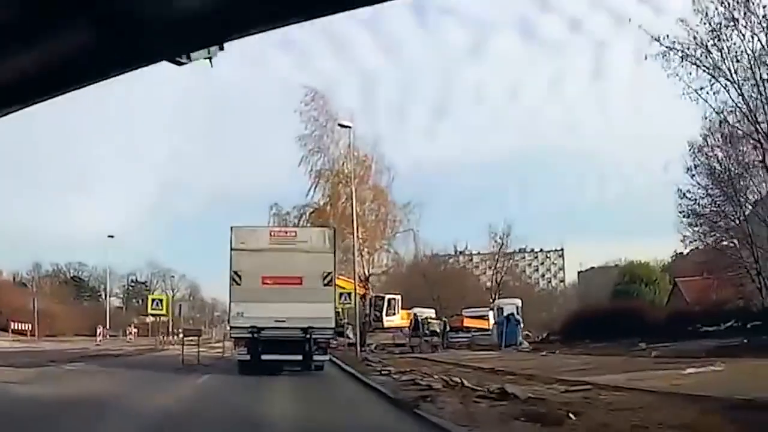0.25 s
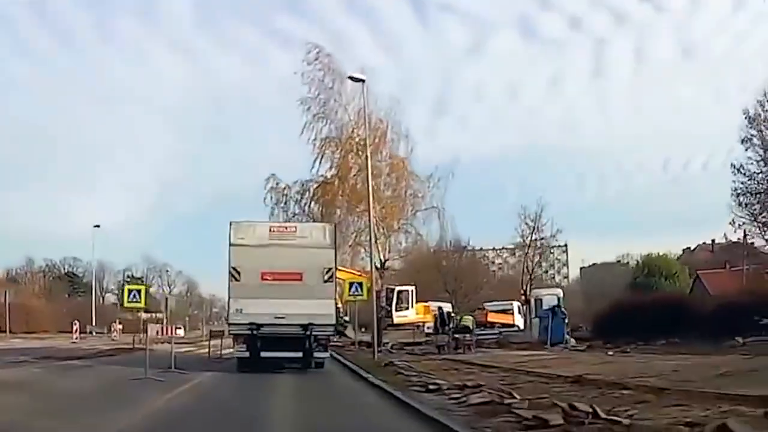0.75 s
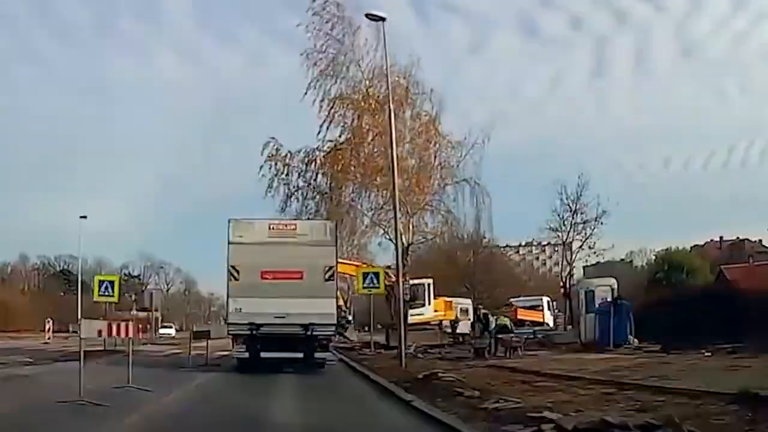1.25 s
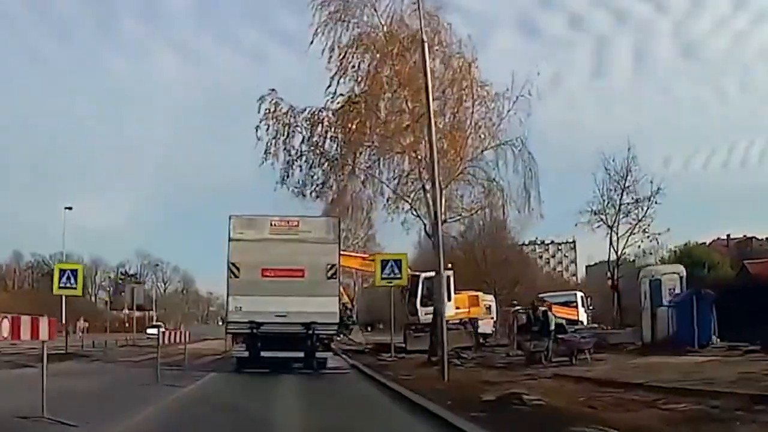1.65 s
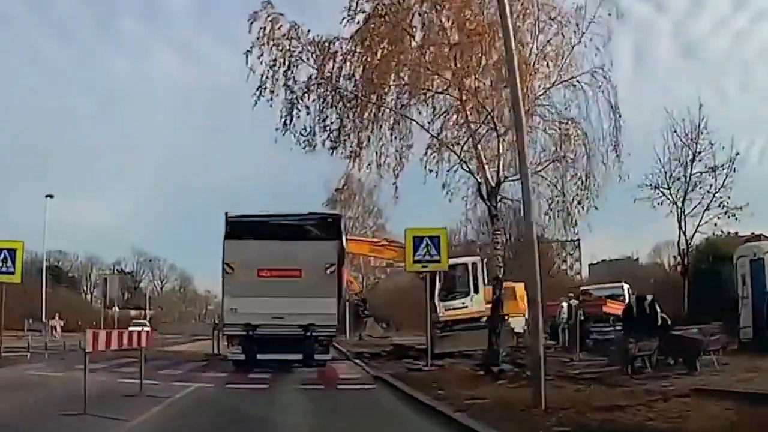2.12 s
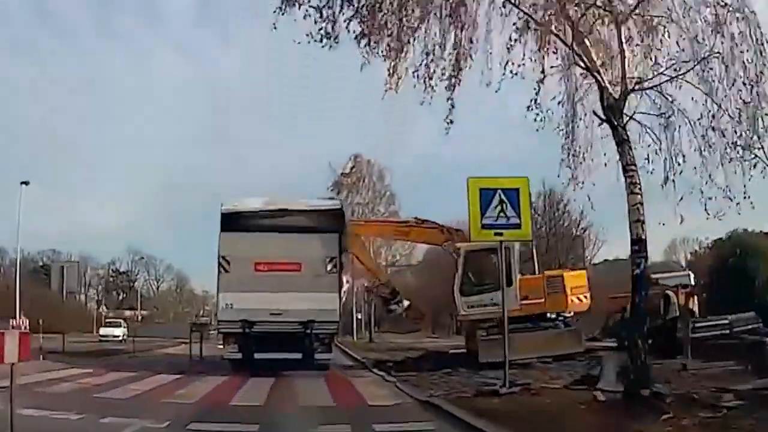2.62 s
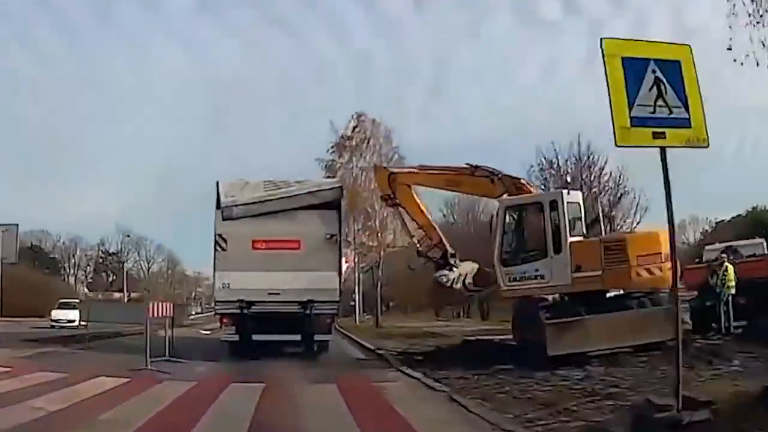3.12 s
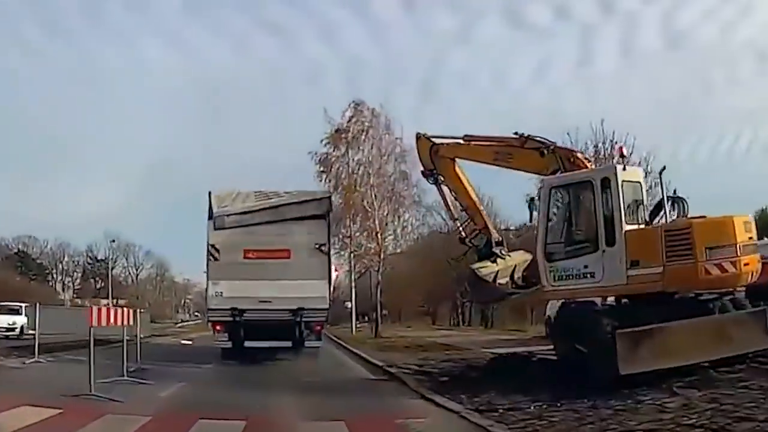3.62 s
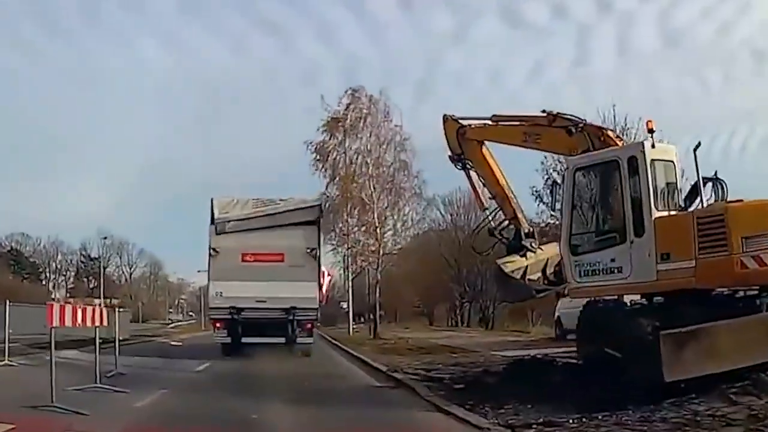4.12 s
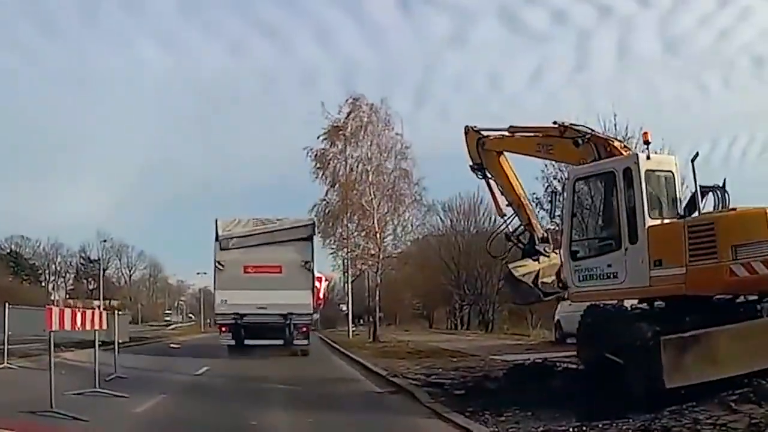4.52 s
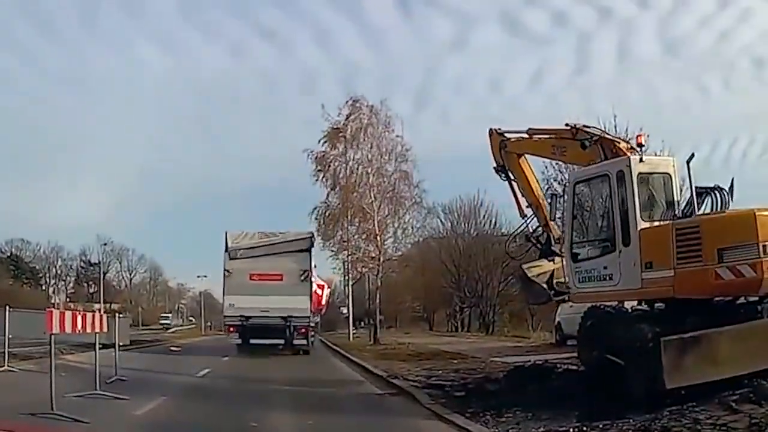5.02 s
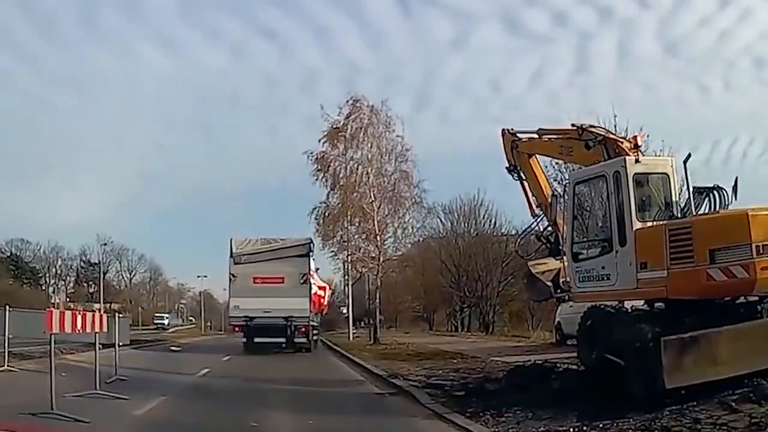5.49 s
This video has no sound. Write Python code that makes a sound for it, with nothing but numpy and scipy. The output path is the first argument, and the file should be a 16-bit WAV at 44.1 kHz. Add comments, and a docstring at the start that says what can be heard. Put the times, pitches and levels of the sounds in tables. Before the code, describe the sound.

The microphone sits inside a car cabin, with limited treble. From 0 to 2.2 s there is steady, muffled tyre roar with low suspension rumble and a faint engine hum, which fades after 2 s. At about 2.3 s the truck's roof hits something ahead: a blunt metallic crunch, strongest until 2.45 s, then ragged scraping and short wavering groans and squeals around 2.6-2.9 s, dulled by the windscreen and thinning afterwards. From 3.2 s the car pounds over broken road, far louder and closer: irregular deep thumps, booming cabin air, shuddering panels, chattering trim and dozens of dry knocks. A harsh overloaded pop lands at 3.61 s; two hard plastic cracks at the microphone come at 4.36 and 4.40 s. The pounding collapses after 4.5 s. Small hollow clunks and knocks follow at 4.65-5.1 s, with tiny high brake squeaks, one very faint near 5.5 s, over a softer, sinking road roar until the end.

```python
"""Truck roof tearing, then broken road

Microphone inside a car that follows a box truck through road works; tyre roar and engine hum fill the cabin.
Ahead, beyond the windscreen, the truck's roof crashes into an overhead obstacle: random slips ring its metal.
The car then jolts over broken road: blows and noise ring the body, cabin air, panels and trim.
Two sharp bangs reach the microphone's mount and one blow pins its diaphragm.
The roar sinks as the car slows, with faint brake squeaks made of pitch-jittered sines.
"""
import sys
import numpy as np
from scipy import signal
from scipy.fft import rfft, irfft
from scipy.io import wavfile
from scipy.ndimage import uniform_filter1d, map_coordinates

SR = 44100
rng = np.random.default_rng(int(sys.argv[2]) if len(sys.argv) > 2 else 0)


def master(y):
    """Save y as 16-bit WAV."""
    cut = np.clip(np.atleast_2d(y).T, -1, 1)
    pcm = np.round(cut * 32767)  # scale
    wavfile.write(sys.argv[1], SR, pcm.astype(np.int16))


N = 253707
TIME = np.arange(N) / SR  # s

# All levels are relative to their layer unless called peak or rms.
# The truck's roof catches and tears on: t/s, hold/s, thrum level/dB, panel level/dB, grinding level/dB
SCRAPES = [(2.275, 0.042, -44.5, -43, -48), (2.324, 0.061, -27.5, -28.5, -37.5),
           (2.50, 0.2, -36, -37.5, -45.5), (2.70, 0.011, -38.5, -31.5, -43), (2.865, 0.026, -35, -41, -54),
           (3.0, 0.083, -46, -43.5, -57.5), (3.125, 0.05, -44, -44, -52), (3.27, 0.37, -45, -37.5, -51.5)]
SCRAPE_ATTACK_S, SCRAPE_RELEASE_DB_PER_S = 0.016, 71.5
# Roof panel resonances: f/Hz, width/Hz, level/dB
ROOF_MODES = [(417, 14.8, 4), (504, 82, -3), (654, 160, -7), (921, 96, -6), (1014, 23, -3), (1191, 81, -7),
              (1528, 210, -15)]
# Resonances of the torn edge: f/Hz, width/Hz, level/dB
EDGE_MODES = [(1870, 110, -7.5), (2250, 130, -8), (2558, 30, 0), (2798, 156, -11.5), (4500, 220, -21)]
# Friction tones of the groaning roof, then of the brakes: t/s, length/s, f/Hz, pitch jitter/share, level/dB
SQUEAKS = [(2.585, .05, 895, .015, -43), (2.64, .08, 1000, .016, -36), (2.708, .075, 490, .012, -31.5),
           (2.745, .065, 1005, .02, -39), (2.84, .045, 415, .015, -38), (4.68, .05, 2650, .05, -61.5),
           (4.698, .016, 5200, .03, -71), (4.79, .03, 2800, .05, -55.5), (4.992, .02, 5350, .015, -78),
           (5.45, .16, 4480, .035, -72.5)]

# How hard the broken road shakes the car: t/s, level/dB
SHAKE = [(3.15, -34), (3.218, -23.5), (3.442, -30.5), (3.504, -14), (4.48, -19), (4.734, -30.5),
         (4.778, -27), (4.9, -70)]
# Steady response to the shaking; panels and trim follow only a share of its swing in dB
SHAKE_HEAVE_DB, SHAKE_BOOM_DB, SHAKE_PANEL_DB, SHAKE_TRIM_DB = -16.5, -9.5, -33.5, -50.5
RATTLE_FOLLOWS = 0.35
# A wheel drops into a hole: t/s, hold/s, suspension heave level/dB, body boom level/dB, rattle level/dB
JOLTS = [(3.193, 0.057, -40, -43.5, -38), (3.267, 0.033, -13.5, -29, -32.5), (3.395, 0.018, -46, -34, -32),
         (3.492, 0.083, -23, -22, -34.5), (3.590, 0.009, -20.5, -27, -27.5),
         (3.666, 0.1, -35.5, -29, -41.5), (3.753, 0.031, -32.5, -25, -32.5),
         (3.867, 0.041, -27.5, -22.5, -30.5), (3.933, 0.022, -18.5, -32, -37),
         (4.032, 0.012, -17.5, -35, -36), (4.116, 0.019, -27.5, -24, -39.5),
         (4.16, 0.019, -19.5, -27.5, -36.5), (4.198, 0.029, -29, -24, -32.5), (4.252, 0.029, -27, -33, -36),
         (4.332, 0.075, -15, -24.5, -29.5), (4.411, 0.033, -35.5, -26.5, -37),
         (4.528, 0.024, -16.5, -37, -50), (4.753, 0.012, -33, -34.5, -37)]
JOLT_ATTACK_S, JOLT_RELEASE_DB_PER_S, HEAVE_RELEASE_DB_PER_S = 0.013, 187, 117.5
TRIM_UNDER_PANEL_DB = -20  # trim chatter against the panels' rattle
# Car body and cabin air: f/Hz, width/Hz, level/dB
BODY_MODES = [(78.8, 25, -1), (132, 24, -4), (176.3, 21, -3), (231, 50, -3), (289, 98, -12)]
# Dashboard and door panels: f/Hz, width/Hz, level/dB
PANEL_MODES = [(312, 123, 3.5), (443, 100, 4), (521.5, 48, 0.5), (673, 51, -1), (744, 36, 1.5),
               (872, 132, -2.5), (1010, 184, -5), (1274, 202, -8.5)]
# Small plastic trim: f/Hz, width/Hz, level/dB
TRIM_MODES = [(1405, 91, 10.5), (2050, 330, 0.5), (2395, 510, 0.5), (2730, 570, -2), (4360, 230, -6.5),
              (5380, 400, -24)]

# Tyre blows on the body: t/s, peak level/dB
THUDS = [(3.483, -19), (3.511, -11), (3.597, -27), (3.668, -24), (3.714, -20.5), (3.868, -14),
         (3.899, -14.5), (3.955, -16), (4.040, -13.5), (4.128, -15.5), (4.172, -17.5), (4.217, -18.5),
         (4.261, -16.5), (4.289, -28), (4.329, -12), (4.376, -12.5), (4.433, -18), (4.493, -21)]
# The cabin air's deepest resonance: f/Hz, width/Hz, level/dB
AIR_MODES = [(84, 5.2, 0)]
# Shoves that set the cabin air booming: t/s, peak level/dB
BOOMS = [(3.203, -19), (3.28, -27.5), (3.754, -23), (4.029, -20), (4.203, -21.5), (4.452, -20.5)]
# The body bouncing on its springs: f/Hz, width/Hz, level/dB
SPRING_MODES = [(30.8, 23, 3.5), (52, 22, 0.5)]
# The deepest holes bottom the springs out: t/s, peak level/dB
BOTTOMINGS = [(3.586, -18), (3.919, -17), (4.375, -18.5)]

# Knocks of loose fittings: t/s, panel level/dB, trim level/dB, tick level/dB, buzz decay/s
KNOCKS = [(2.884, -28, -38, -22, 0.014), (3.186, -22.5, -34, -26, 0.018), (3.221, -23, -27, -24, 0.0055),
          (3.259, -8, -23.5, -17, 0.0032), (3.2678, -16, -25.5, -38, 0.011),
          (3.279, -11.5, -29, -36, 0.0088), (3.289, -14, -40, -38, .006), (3.306, -20, -28, -29, .005),
          (3.317, -21.5, -24, -21, .005), (3.356, -30, -20, -21, .006), (3.3645, -13, -17.5, -24, 0.0048),
          (3.4041, -29, -19.5, -25, 0.01), (3.526, -23, -24.5, -32, 0.0033), (3.546, -15, -33, -28, 0.0047),
          (3.593, -20, -30, -14, .004), (3.635, -22, -32, -19, .004), (3.6395, -6.5, -18.5, -17, 0.0068),
          (3.664, -22, -31.5, -34, .0047), (3.675, -11, -29, -30, 0.0037), (3.739, -16.5, -37, -32, 0.0044),
          (3.788, -17, -30, -33, 0.0035), (3.815, -16, -32, -38, 0.0074), (3.867, -21, -39, -34, 0.0052),
          (3.888, -9, -30, -35, 0.0048), (3.909, -13, -35, -32, 0.0038), (3.962, -15, -26, -30, 0.0071),
          (3.978, -22, -28, -29, .004), (4.0225, -17, -49, -42, 0.0096), (4.05, -13, -34, -24, 0.0067),
          (4.1148, -12, -41, -34, 0.0061), (4.125, -17, -33, -26, 0.0059), (4.159, -15, -37, -39, 0.0069),
          (4.209, -17.5, -36, -32, 0.0046), (4.225, -20, -31.5, -26, 0.0037),
          (4.243, -13, -28.5, -29, 0.0023), (4.2605, -8.5, -42, -34, 0.0045),
          (4.279, -18, -38, -36, 0.0036), (4.342, -17, -39.5, -26, .004),
          (4.4405, -10.5, -24.5, -31, 0.0036), (4.477, -26, -41, -21, .005),
          (4.657, -25.5, -32.5, -39, .008), (4.779, -21.5, -35.5, -43, 0.017),
          (4.9195, -27, -30.5, -34, 0.014), (4.938, -18, -29.5, -46, 0.009), (4.971, -24, -43, -47, 0.018),
          (5.032, -29.5, -41.5, -46, 0.016), (5.075, -26, -37, -46, 0.012)]
# Full range of each knock's own panel mix (dB) and pitch (share)
KNOCK_MIX_DB, KNOCK_DETUNE = 8.5, .16
# A hollow loose part: f/Hz, width/Hz, level/dB
HOLLOW_MODES = [(380, 25, 5), (645, 14, -16), (790, 47, -12), (1010, 100, -13.5), (1460, 61, -19),
                (2620, 140, -33)]
# It clunks as the car settles: t/s, peak level/dB, pitch factor
CLUNKS = [(4.761, -24.5, 0.58), (4.777, -25.5, 0.63), (4.806, -27, 1.2), (4.922, -29.5, 1.62),
          (4.9365, -23.5, 0.93)]

# Bangs on the microphone's mount: t/s, low ring f/Hz, low ring level/dB, high ring level/dB, tick level/dB
MOUNT_BANGS = [(4.3555, 1360, -9, -15.5, -47.5), (4.3997, 936, -1.5, -13, -22)]
# Bounce and rattling tail, against the first blow
BANG_BOUNCE_DB, BANG_TAIL_DB, BANG_TAIL_S = -4, -29, 0.0055
# One blow pins the diaphragm: t/s, length/s, height, rebound height, rebound decay/s
SLAM = (3.6139, .00113, .92, .36, .0007)

# Tyre roar over the drive: t/s, level/dB
DRIVE = [(0, -37.5), (.9, -38), (1.7, -39), (2.3, -38.5), (3.1, -41.5), (4.6, -43.5), (5.05, -43.5),
         (5.3, -45.5), (5.75, -45.5)]
# Smooth cabin roar at speed: f/Hz, level per Hz/dB
ROAD_FAST = [(40, -14.5), (78, 0.5), (105, -8), (150, -6.5), (190, -2.5), (290, -6), (400, -7.5),
             (520, -13), (750, -14.5), (1050, -17.5), (1700, -30.5), (2700, -39.5), (3300, -54),
             (6000, -62.5), (9000, -98)]
# Cabin roar when slow: f/Hz, level per Hz/dB
ROAD_SLOW = [(41, -55), (70, -2.5), (156, 1.5), (226, 4), (426, -2), (459, -0.5), (523, -6.5), (1040, -10),
             (1260, -17.5), (1690, -25), (1890, -25.5), (2550, -26.5), (3700, -47), (4450, -42),
             (6000, -52), (7800, -92.5), (13200, -120)]
# Cabin resonances that the tyres excite at speed: f/Hz, width/Hz, level/dB
CABIN_MODES = [(239.1, 12, -4.5), (256.2, 7, 2), (282, 13, -6.5), (337, 15, -5.5), (631, 14, -10),
               (860, 22, -13.5), (1236, 40, -19.5), (2660, 120, -47)]
# Suspension rumble against the tyre roar level, and its random swell
RUMBLE_DB, RUMBLE_SWELL_DB = -5.5, 2.5
# Engine orders: multiple of the firing rate, rms level/dB before lift-off
ENGINE = [(1, -54.5), (3, -57.5), (4, -46)]
FIRING_HZ, LIFT_OFF_S, ENGINE_FADE_DB_PER_S = 60.37, 2, 27

MIC_LIMIT, CUTOFF_HZ = .85, 8300  # full scale = 1


def tearing_roof():
    """Slipping metal rings the truck's box, roof panel and torn edge; the windscreen dulls the distant sound."""
    thrum_gain, panel_gain, edge_gain = bursts(SCRAPES, SCRAPE_ATTACK_S, SCRAPE_RELEASE_DB_PER_S)
    slips = contacts(per_s=1400, spread_db=-3.0)
    thrum = even(cut(contacts(per_s=550, spread_db=1.0), [68, 310], "band", order=3), 0.052)

    panel = waver(resonate(slips, ROOF_MODES), 0.022, 5.2, 35)
    panel = even(cut(cut(panel, 1800, "low", order=4), 240, "high"), 0.029)

    edge = waver(resonate(slips, EDGE_MODES), 0.0022, 27, 90)
    edge = even(cut(cut(edge, 3100, "low", order=5), 2200, "high"), 0.093)

    hiss = cut(contacts(per_s=1200, spread_db=-0.5), [3400, 4600], "band")
    hiss = even(cut(hiss, 5060, "low", order=8), 0.047)

    # Random catching roughens the grind
    unevenness = rms_one(cut(rng.standard_normal(N), [25, 110], "band"))
    catching = from_db(2.0 * np.clip(unevenness, -2, 2))
    grinding = edge_gain * catching * (from_db(-2.5) * edge + from_db(-24.0) * hiss)
    return from_db(-1.0) * thrum_gain * thrum + from_db(0.05) * panel_gain * panel + grinding


def squeaks():
    """Stick-slip tones of roof and brakes swell and fade; their pitch jitters faster the higher they are."""
    out = np.zeros(N)
    age = np.arange(SR // 4) / SR
    for s, length, hz, jitter, db in SQUEAKS:
        swell = np.sqrt(np.abs(np.sin(np.pi * np.clip(age / length, 0, 1))))
        unrest = rms_one(cut(rng.standard_normal(len(age)), 0.04 * hz, "low"))
        phase = 2 * np.pi * np.cumsum(hz * (1 + jitter * unrest)) / SR
        start = round(s * SR)
        out[start:start + len(age)] += from_db(db) * swell * np.sqrt(2) * np.sin(phase)
    return out


def jolting():
    """Broken road pounds the body in random lumps that also make panels shudder and trim chatter."""
    shake = shaking()
    _, jolt, rattle = bursts(JOLTS, JOLT_ATTACK_S, JOLT_RELEASE_DB_PER_S)
    rattle_shake = shake ** RATTLE_FOLLOWS
    boom_gain = np.hypot(jolt, from_db(SHAKE_BOOM_DB) * shake)
    panel_gain = np.hypot(rattle, from_db(SHAKE_PANEL_DB) * rattle_shake)
    trim_gain = np.hypot(from_db(TRIM_UNDER_PANEL_DB) * rattle, from_db(SHAKE_TRIM_DB) * rattle_shake)
    lumps = np.clip(rms_one(cut(rng.standard_normal(N), [8, 30], "band")), -2, 2)

    boom = cut(resonate(contacts(per_s=250, spread_db=-3.0), BODY_MODES), 390, "low", order=3)
    boom = even(cut(boom, 73.0, "high", order=4), 0.032)

    shudder = cut(resonate(contacts(per_s=800, spread_db=3.5), PANEL_MODES), 1700, "low", order=4)
    shudder = even(cut(shudder, 270, "high"), 0.036)

    ticks = contacts(per_s=1400, spread_db=3.0)
    chatter = even(cut(resonate(ticks, TRIM_MODES), 2950, "low", order=6), 0.069)
    sizzle = even(cut(cut(ticks, [4000, 5400], "band"), 5000, "low", order=8), 0.052)
    trim = trim_gain * (from_db(1.0) * chatter + from_db(-21) * sizzle)

    rattling = from_db(2.1 * lumps) * (from_db(-0.5) * panel_gain * shudder + trim)
    return from_db(-1.5) * boom_gain * boom + rattling


def thuds():
    """Tyre blows thump the body, set the cabin air booming and bottom out the springs."""
    body = struck([(s, db, 1) for s, db in THUDS], BODY_MODES, contact_s=0.0022, spread_db=2.5)
    air = struck([(s, db, 1) for s, db in BOOMS], AIR_MODES, contact_s=0.011, spread_db=0)
    springs = struck([(s, db, 1) for s, db in BOTTOMINGS], SPRING_MODES, contact_s=0.019, spread_db=0.0)
    return body + air + springs


def knocks(bounce_db=-13, strike=0.33):
    """A loose fitting strikes, then buzzes briefly as decaying noise against panels and trim."""
    panels, force, bright, ticks = np.zeros((4, N))
    age = np.arange(SR // 8) / SR
    for s, panel_db, trim_db, tick_db, decay in KNOCKS:
        blow = from_db(bounce_db) * rng.standard_normal(len(age)) * np.exp(-age / decay)
        blow[0] = strike
        pitch = 1 + KNOCK_DETUNE * (rng.random() - .5)
        modes = [(hz * pitch, width, db + KNOCK_MIX_DB * (rng.random() - .5))
                 for hz, width, db in PANEL_MODES]
        start = round(s * SR)
        span = slice(start, start + len(age))
        panels[span] += from_db(panel_db) * resonate(blow, modes)
        force[span] += from_db(panel_db) * blow
        bright[span] += from_db(trim_db) * blow
        ticks[span] += from_db(tick_db) * blow
    ring = from_db(17.0) * cut(panels, 900, "low", order=3)
    crack = from_db(13) * cut(cut(force, [450, 1000], "band"), 1300, "low", order=4)
    trim = from_db(10.5) * cut(resonate(bright, TRIM_MODES), 3200, "low", order=5)
    tick = from_db(-17.5) * cut(ticks, [3700, 5300], "band", order=4)
    return ring + crack + trim + tick


def clunks():
    """A hollow part drops back and bounces, ringing at a new pitch on each hit."""
    return struck(CLUNKS, HOLLOW_MODES, contact_s=0.001, spread_db=-0.5)


def mount_bangs():
    """Stiff plastic right at the microphone cracks, bounces once and rattles for a moment."""
    out = np.zeros(N)
    for s, low_hz, low_db, high_db, tick_db in MOUNT_BANGS:
        tail = (TIME > s) * np.exp(-np.abs(TIME - s) / BANG_TAIL_S)
        blow = from_db(BANG_TAIL_DB) * rng.standard_normal(N) * tail
        blow[round(s * SR)] = 1
        # The bounce comes one swing of the low ring later
        blow[round((s + 1 / low_hz) * SR)] = from_db(BANG_BOUNCE_DB)
        out += cut(resonate(blow, [(low_hz, 360, low_db)]), 1600, "low", order=4)
        out += cut(resonate(blow, [(2460, 480, high_db)]), 2850, "low", order=10)
        out += resonate(blow, [(4030, 610, tick_db), (5600, 750, tick_db - 9.0)])
    return from_db(19.5) * cut(-out, 5900, "low", order=14)


def slam(release_s=.000045):
    """The diaphragm is pinned for about a millisecond; the pulse sags, then rebounds the other way."""
    s, length, height, rebound, decay = SLAM
    released = np.clip((TIME - s - length) / release_s, 0, 1)
    push = height * np.clip((TIME - s) * SR, 0, 1) * (1 - released)
    recoil = rebound * released * np.exp(-np.abs(TIME - s - length) / decay)
    pinned = push - recoil
    swing = cut(pinned, 60, "high", order=1)  # makes the pulse sag
    return cut(swing, 4140, "low", order=5) + resonate(pinned, [(8100, 240, -13.0)])


def suspension(scrape_db=-5):
    """A low rumble follows tyre roar and shaking, heaves at each hole and swells under the scrapes."""
    sway = resonate(rng.standard_normal(N), [(27.1, 19.0, -0.23), (50.5, 17, -2.3)])
    sway = cut(cut(sway, 85, "low", order=4), 27, "high")
    swell = rms_one(cut(rng.standard_normal(N), [2, 8], "band"))
    rolling = from_db(curve(DRIVE) + RUMBLE_DB + RUMBLE_SWELL_DB * swell)
    heave = from_db(-9.0) * bursts(JOLTS, JOLT_ATTACK_S, HEAVE_RELEASE_DB_PER_S)[0]
    scrape = from_db(scrape_db) * bursts(SCRAPES, SCRAPE_ATTACK_S, SCRAPE_RELEASE_DB_PER_S)[0]
    shaken = from_db(SHAKE_HEAVE_DB) * shaking()
    gain = np.linalg.norm([rolling, heave, scrape, shaken], axis=0)  # adds in power
    return gain * even(sway, 0.16)


def road():
    """Tyre noise excites the cabin; its colour crossfades from fast to slow as the car slows."""
    slow = np.clip((TIME - 3.0) / 2.0, 0, 1)
    drone = cut(resonate(rng.standard_normal(N), CABIN_MODES), 210, "high", order=4)
    drone = rms_one(cut(drone, 1900, "low", order=4))
    fast = from_db(-2.0) * coloured_noise(ROAD_FAST) + from_db(-5.0) * drone
    tread = cut(resonate(rng.standard_normal(N), [(1239, 86, 0)]), 1500, "low", order=4)
    slow_roar = coloured_noise(ROAD_SLOW) + from_db(-12.5) * rms_one(tread)
    roar = np.sqrt(1 - slow) * even(fast, 0.14) + np.sqrt(slow) * slow_roar
    return from_db(curve(DRIVE)) * roar


def engine(wander=0.0023):
    """A four-cylinder hum of firing-rate multiples dies away once the driver lifts off."""
    drift = rms_one(cut(rng.standard_normal(N), [.5, 3], "band"))
    speed = 1 + wander * np.clip(drift, -2, 2)
    phase = 2 * np.pi * np.cumsum(FIRING_HZ * speed) / SR
    hum = np.zeros(N)
    for multiple, db in ENGINE:
        hum += np.sqrt(2) * from_db(db) * np.sin(round(multiple) * phase + rng.uniform(0, 2 * np.pi))
    return hum * from_db(-ENGINE_FADE_DB_PER_S * np.maximum(TIME - LIFT_OFF_S, 0))


def shaking(fade_db_per_s=300):
    """Strength of the shaking as a gain, fading quickly either side of the broken stretch."""
    outside = np.abs(TIME - np.clip(TIME, SHAKE[0][0], SHAKE[-1][0]))
    return from_db(curve(SHAKE) - fade_db_per_s * outside)


def struck(hits, modes, contact_s, spread_db):
    """Rows of t/s, peak level/dB, pitch factor: soft blows ring the modes, each in a random mix."""
    out = np.zeros(N + SR)
    age = np.arange(SR // 4) / SR
    push = np.sin(np.pi * np.clip(age / contact_s, 0, 1)) ** 2
    mixes = spread_db * rng.standard_normal((len(hits), len(modes)))
    for (s, db, pitch), mix in zip(hits, mixes):
        own_modes = [(hz * pitch, width, level + m) for (hz, width, level), m in zip(modes, mix)]
        ring = resonate(push, own_modes)
        start = round(s * SR)
        out[start:start + len(age)] += from_db(db) * ring / np.abs(ring).max()
    return out[:N]


def waver(x, depth, slow_hz, fast_hz):
    """Pitch wanders at random by the rms share `depth`, as bending metal stiffens and slackens."""
    bend = depth * rms_one(cut(rng.standard_normal(N), [slow_hz, fast_hz], "band"))
    return map_coordinates(x, [np.arange(N) + np.cumsum(bend)], order=3, mode="mirror")


def contacts(per_s, spread_db):
    """Random tiny impacts of uneven strength and either sign."""
    sizes = from_db(spread_db * np.minimum(rng.exponential(1, N), 4)) * rng.choice([-1, 1], N)
    return sizes * (rng.random(N) < per_s / SR)


def resonate(x, modes):
    """Parallel two-pole resonances of alternating sign; the width sets how fast each rings down."""
    out = np.zeros(len(x))
    for k, (hz, width, db) in enumerate(modes):
        r = np.exp(-np.pi * width / SR)
        poles = [1, -2 * r * np.cos(2 * np.pi * hz / SR), r * r]
        gain = (-1) ** k * from_db(db) * (1 - r * r) / 2
        out += gain * signal.lfilter([1, 0, -1], poles, x + 1e-18)
    return out


def coloured_noise(spectrum):
    """Noise shaped to rows of f/Hz, level/dB; rms 1."""
    hz, db = np.transpose(spectrum)
    grid = np.maximum(np.fft.rfftfreq(N, 1 / SR), 1)
    gain = from_db(np.interp(np.log(grid), np.log(hz), db))
    return rms_one(irfft(rfft(rng.standard_normal(N)) * gain, N))


def bursts(rows, attack_s, release_db_per_s):
    """Rows of t/s, hold/s, levels/dB rise, hold and die away, adding in power; one gain per level column."""
    power = 0
    for s, hold, *db in rows:
        rise = np.clip((TIME - s) / attack_s, 0, 1)
        fall = from_db(-release_db_per_s * np.clip(TIME - s - attack_s - hold, 0, 2))
        power = power + np.outer(from_db(db), rise * fall) ** 2
    return np.sqrt(power)


def curve(rows):
    """Rows of t/s, value joined by straight lines."""
    return np.interp(TIME, *np.transpose(rows))


def even(x, window_s):
    """Holds the slow level at rms 1 and keeps the grain."""
    power = uniform_filter1d(x ** 2, max(int(window_s * SR), 2))
    return x / np.sqrt(np.abs(power) + 1e-12)


def cut(x, hz, kind, order=2):
    """Low-, high- or band-pass."""
    return signal.sosfilt(signal.butter(order, hz, kind, fs=SR, output="sos"), x + 1e-18)


def rms_one(x):
    """Scaled to rms 1."""
    return x / np.sqrt(np.mean(x ** 2) + 1e-20)


def from_db(db):
    """Decibels to gain."""
    return 10 ** (np.asarray(db) / 20)


def scene():
    """The scraping roof ahead, the broken road underneath and the steady drive behind both."""
    friction = tearing_roof() + squeaks()
    rough_road = jolting() + thuds() + knocks() + clunks() + mount_bangs() + slam()
    drive = suspension() + road() + engine()
    return (friction + rough_road + drive)[None]


def record(dry):
    """The microphone hisses faintly and clips at its limit; the top is cut."""
    hiss = from_db(-91.0) * rng.standard_normal(dry.shape)
    limited = np.clip(dry + hiss, -MIC_LIMIT, MIC_LIMIT)
    return cut(limited, CUTOFF_HZ, "low", order=20)


dry = scene()
out = record(dry)
master(out)
```